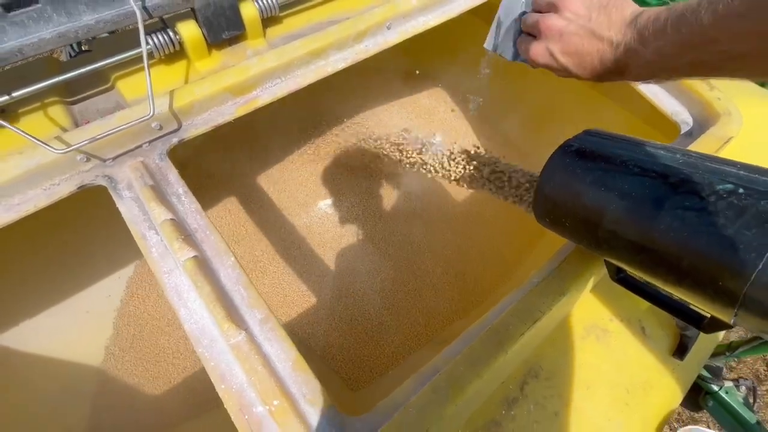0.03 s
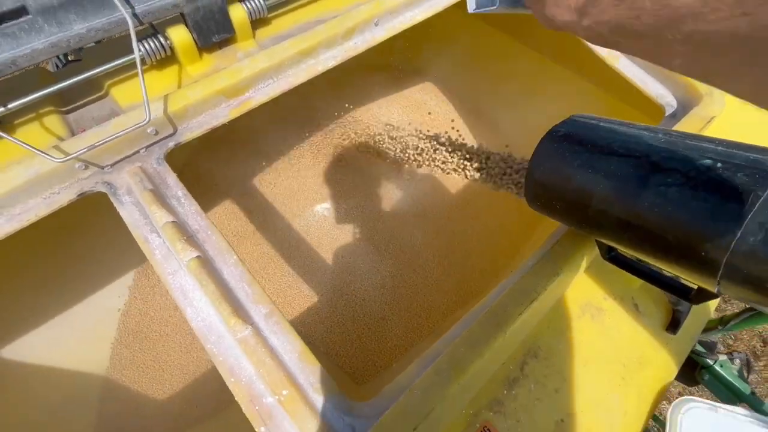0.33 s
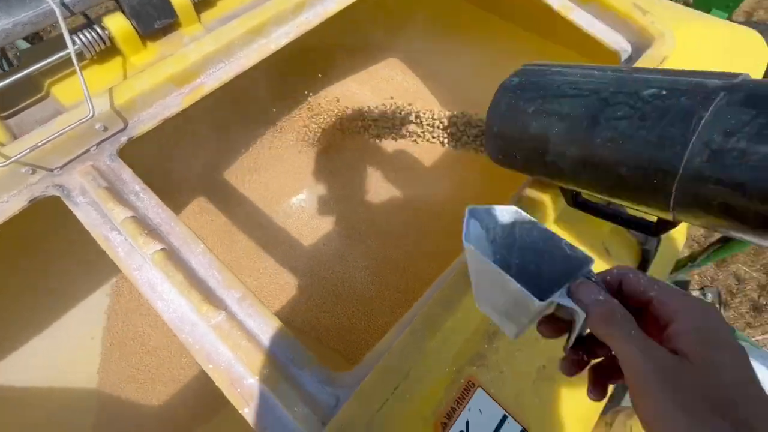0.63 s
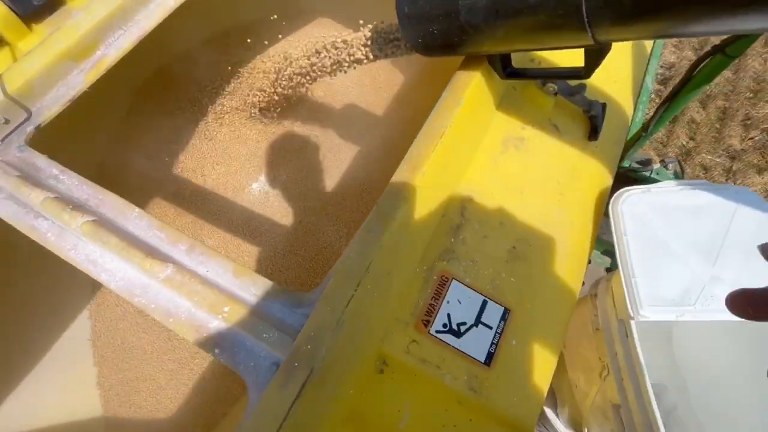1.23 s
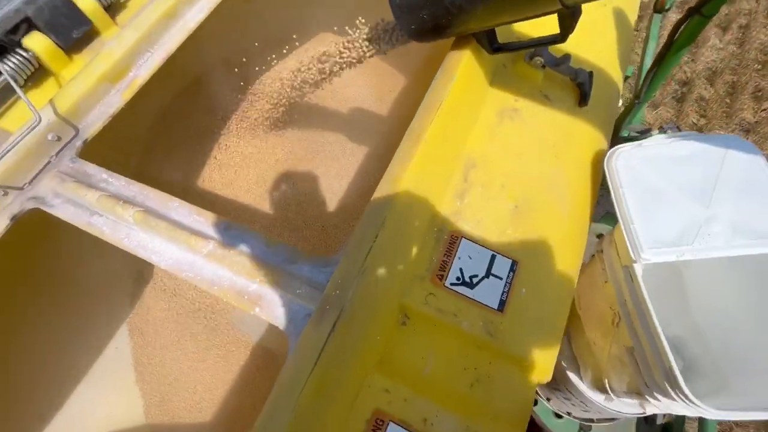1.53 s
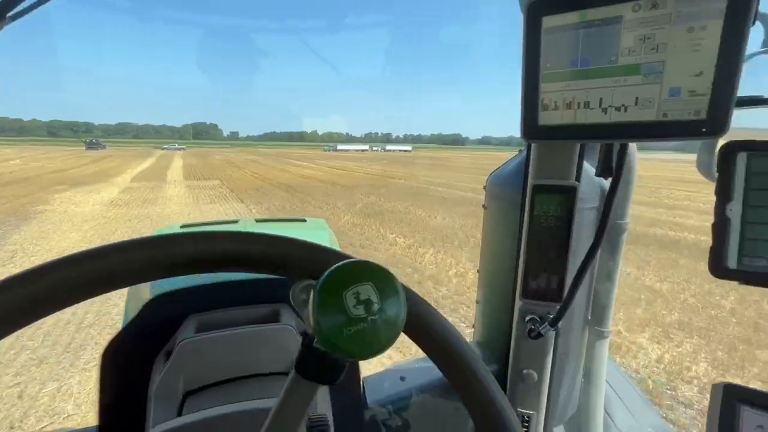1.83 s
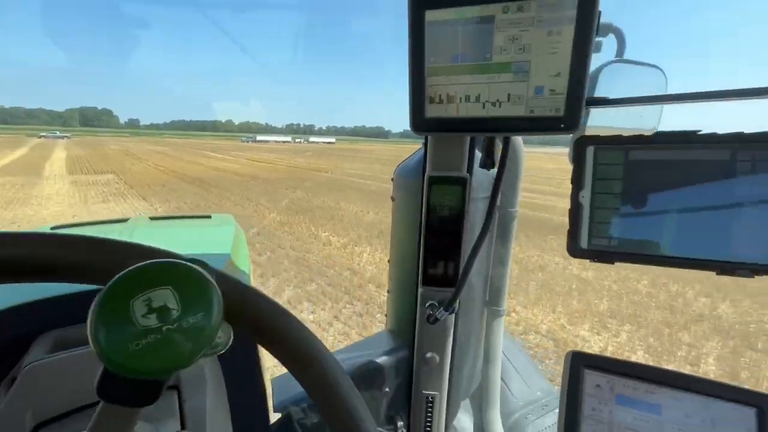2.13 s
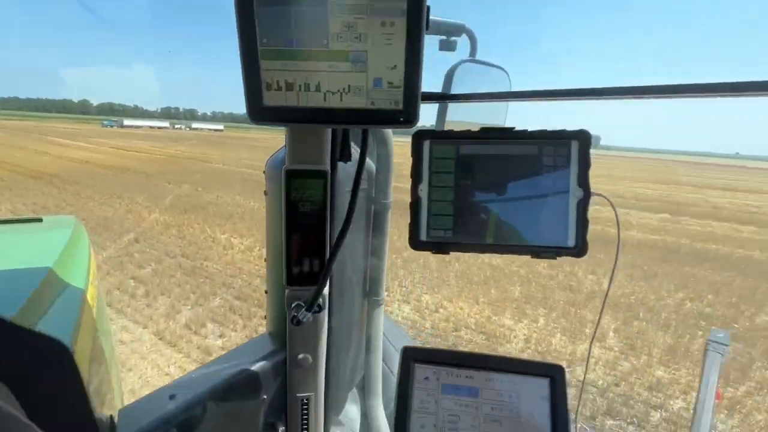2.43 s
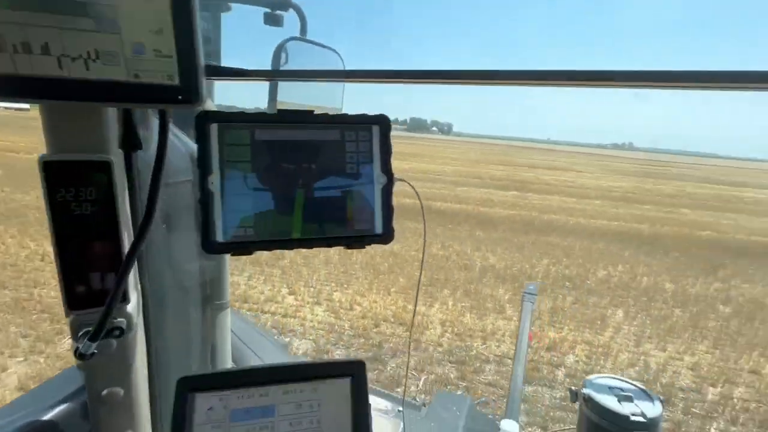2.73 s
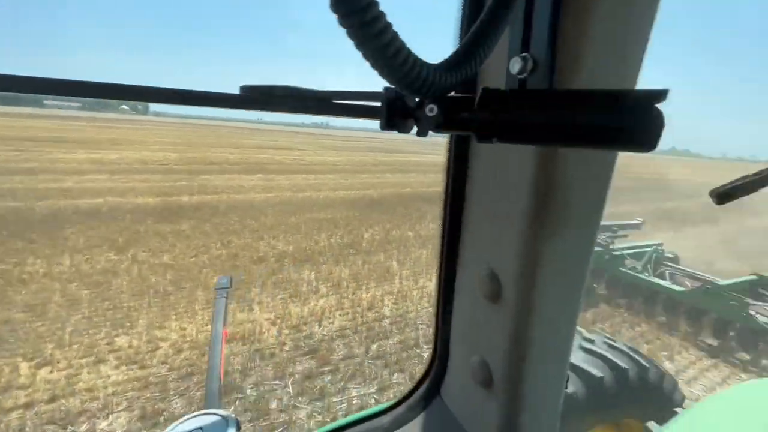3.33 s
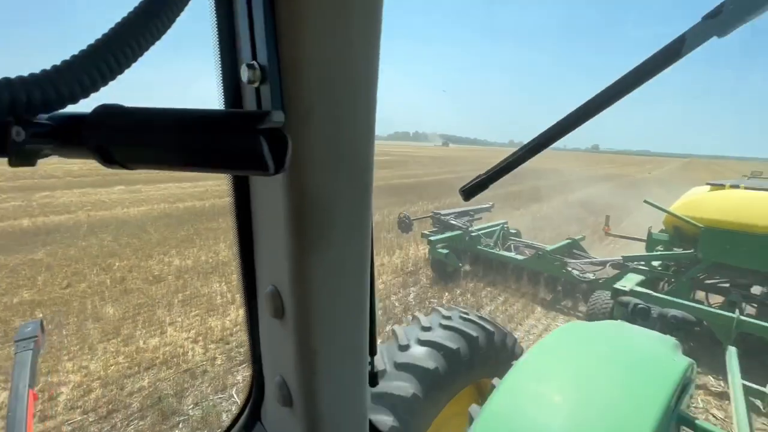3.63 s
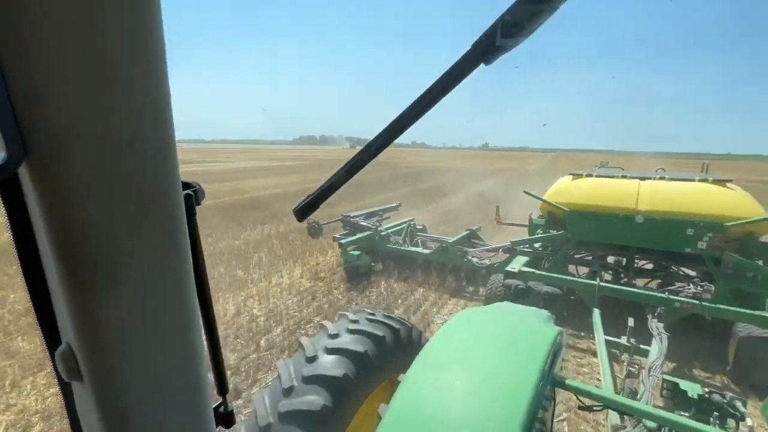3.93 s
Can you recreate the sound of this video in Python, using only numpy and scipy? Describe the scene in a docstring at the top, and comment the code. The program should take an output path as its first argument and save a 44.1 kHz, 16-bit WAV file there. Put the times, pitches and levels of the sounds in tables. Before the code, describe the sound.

Grain hisses into a planter bin before a sudden switch to a tractor cab's diesel drone.

```python
"""A six-cylinder tractor diesel drones in a closed cab, after an opening scene of seed filling a planter.
First, grains stream from a conveyor spout onto the heap in a plastic hopper, ringing spout and wall,
over the throb of a small petrol engine. At 1.67 s the scene cuts to the cab: firing note and clatter,
whine of hydraulic pump and gears. Tyres and frame make the cab boom more and more, and loose fittings
knock a few times on the rough field."""
import sys
import numpy as np
from scipy import signal
from scipy.fft import rfft, irfft
from scipy.io import wavfile
from scipy.ndimage import map_coordinates

SR = 44100
rng = np.random.default_rng(int(sys.argv[2]) if len(sys.argv) > 2 else 0)


def to_wav(s):
    """Save 16-bit WAV."""
    ch = np.atleast_2d(s).T  # columns
    pcm = np.round(np.clip(ch, -1, 1) * 32767)  # PCM
    wavfile.write(sys.argv[1], SR, pcm.astype(np.int16))


N = 176400
TIME_S = np.arange(N) / SR
BIN_HZ = np.maximum(np.arange(N // 2 + 1) * SR / N, 1)
CUT_S = 1.671

# Seed stream strength: time_s, level_db
SEED_FLOW = [(0.0, -25.5), (0.27, -25.5), (0.5, -27), (0.66, -25), (1.59, -27), (1.64, -25.5),
             (1.65, -26.5)]
# Grains on the heap: freq_hz, gain_db
SEED_SPECTRUM = [(350, -26), (560, -23), (770, -3), (880, -13.5), (1000, -15.5), (1250, -6), (1480, -12),
                 (1700, -7.5), (2100, -6.5), (2950, -5.5), (3250, -1.5), (3800, -0.5), (4500, -3),
                 (5400, -5), (5750, -7), (6700, -6.5), (7800, -8.5), (9200, -4), (10500, -3.5),
                 (12500, -3.5), (14500, -14.5)]
# Hopper wall reflections: start_delay_s, cut_delay_s, gain
WALL_ECHOES = [(.0021, 0.0011, 0.079), (.0034, 0.0018, 0.11), (.0052, 0.0047, 0.15)]
# Hopper stereo field: freq_hz, correlation, left_minus_right_db
HOPPER_SPACE = [(100, 0.95, 15), (259, 0.51, -1), (497, -0.35, 2.5), (780, -0.11, -3.5),
                (1400, -0.58, -0.5), (2800, 0.35, 0.5), (3770, 0.18, 1.5), (5100, -0.054, 7),
                (6800, -0.05, 4.5), (8650, 0.038, -2.5), (9400, -0.17, -4.5), (10200, 0.86, 1)]
# Spout and wall modes, relative to the stream: pitch_hz, width_hz, start_db, cut_db
HOPPER_MODES = [(788, 100, -21.5, -25.5), (996, 90, -19, -25), (3340, 360, -11.5, -24.5),
                (3810, 120, -14.5, -15), (4450, 400, -14.5, -20), (5090, 220, -44, -10.5),
                (5370, 550, -20, -18)]
# Spout swinging across: time_s, left_minus_right_db
SPOUT_PAN = [(0, -2.5), (.7, -1.5), (1.65, 0.5)]

# Conveyor engine, low and high harmonics: cycle_multiple; gain_db
CONVEYOR_ORDERS = [2, 3, 4, 5, 6]
CONVEYOR_ORDERS_DB = [-15, -21, -1, 3, -18]
CONVEYOR_OVERTONES = [7, 10, 11, 14, 15, 17, 18]
CONVEYOR_OVERTONES_DB = [-20, -8.5, -21, -13.5, -18, -20, -24]
# Belt rumble: freq_hz, gain_db
BELT_SPECTRUM = [(20, -36), (36, -22), (50, 4), (130, 0), (220, -1), (330, 1.5), (450, -3), (750, -1),
                 (1500, -10), (3000, -25.5)]

# Diesel, pump and gear harmonics: rate_multiple; gain_db
DIESEL_ORDERS = [2, 3, 4, 5, 8, 9, 10, 18, 36, 49, 54, 63, 66, 70]
DIESEL_ORDERS_DB = [-44, -42.5, -52, -37, -42, -45.5, -47.5, -38.5, -49, -52.5, -46.5, -44, -46, -43.5]
PUMP_ORDERS = [4, 5]
PUMP_ORDERS_DB = [1, -2.5]
GEAR_ORDERS = [1, 2, 5, 7, 9]
GEAR_ORDERS_DB = [-0.5, 0.5, -11.5, -21, -21]
# Firing note, engine noise, pump and gear envelopes: time_s, gain_db
FIRING_LEVEL = [(1.7, -36), (2.4, -39.5), (2.57, -25), (2.71, -32), (2.87, -26), (3.1, -27), (3.25, -22.5),
                (3.38, -28), (3.72, -24.5), (4, -28.5)]
ENGINE_NOISE_LEVEL = [(1.72, -28), (1.74, -29), (2.87, -29), (3.07, -30), (3.49, -28.5), (3.97, -29.5)]
PUMP_LEVEL = [(1.7, -35), (2.6, -34), (3.05, -38), (3.6, -35.5), (4, -58)]
GEAR_LEVEL = [(1.7, -44), (2.05, -40), (2.3, -40.5), (2.6, -37), (3.35, -39), (3.55, -42.5), (4, -41.5)]
# Engine and running gear through the glass: freq_hz, gain_db
ENGINE_NOISE_SPECTRUM = [(120, -33), (200, -7), (329, 3), (386, -10.5), (425, -1), (560, -6.5), (640, -11),
                         (780, -10), (950, -10), (1330, -11), (1540, -17.5), (1660, -15), (1770, -18.5),
                         (1920, -14), (2500, -14.5), (2700, -20.5), (3040, -26.5), (5650, -34), (7930, -39),
                         (10700, -39.5), (14000, -58)]
# Cab stereo field: freq_hz, correlation, left_minus_right_db
CAB_SPACE = [(50, 1, -3.5), (160, 0.8, -1.5), (450, 0.58, -0.5), (660, -0.052, 4), (1210, 0.047, 3),
             (1670, -0.36, 1), (2400, 0.12, -0.5), (4740, -0.065, 7), (7140, 0.11, 6.5),
             (9700, -0.058, -1.5), (10600, 0.96, -0.5)]
# Gear and hydraulic whines: pitch_hz, width_hz, level_db
WHINES = [(478.5, 7.4, -46), (1298, 4.8, -42), (2234, 4.1, -51), (3400, 13, -58), (4090, 23, -58),
          (4716, 18, -64), (5150, 25, -60), (5520, 19, -57), (6120, 20, -61), (6620, 15, -63),
          (8300, 60, -69), (10940, 150, -69)]
# Swelling whines: pitch_hz; width_hz, peak_db, peak_s, half_width_s
SWELL_HZ = [2398, 2548, 5739, 5830]
SWELLS = [(12, -43, 3.43, 0.96), (11.9, -38, 3.34, 0.084), (25, -58, 2.5, 0.66), (25, -53, 2.73, .1)]

# Tyres and frame: freq_hz, gain_db
RUMBLE_SPECTRUM = [(20, -22), (35, -28), (62, -4.5), (78, -9), (100, -4), (140, -4), (195, -25)]
# Cab resonance and hum envelopes: time_s, level_db
LOW_BOOM_LEVEL = [(1.7, -34.5), (2.4, -39.5), (3, -29.5), (3.7, -28.5), (4, -31)]
MID_BOOM_LEVEL = [(1.7, -41.5), (3, -41), (3.5, -35.5), (3.83, -27.5), (4, -32)]
HIGH_BOOM_LEVEL = [(1.7, -29), (2, -29), (2.6, -29), (3.1, -36.5), (4, -33.5)]
GROWL_LEVEL = [(1.7, -40), (2.6, -32.5), (3, -48), (4, -56)]
HUM_LEVEL = [(1.7, -40), (2.65, -38.5), (3.05, -44), (3.48, -28), (3.62, -33.5), (3.82, -34), (4, -39)]

# Blows on the trim: start_s, strength_db, relative_ring_db
KNOCKS = [(2.8255, -28, 2), (2.831, -25, -2), (2.962, -36, -6), (3.484, -27.5, -6), (3.783, -28, -6)]
# Trim rattle: freq_hz, gain_db
RATTLE_SPECTRUM = [(300, -20), (800, 9), (1600, 0), (2500, 3), (3500, -12), (6000, -13.5), (9000, -27),
                   (14000, -39)]
# Knocked panel: pitch_hz, gain_db, t60_s
TRIM_MODES = [(840, -5, 0.089), (950, 0, .07), (1230, 9, 0.022), (1360, 2, .016), (2236, -5, 0.1),
              (2650, -6, .13), (4800, -13, .1), (5374, -16, 0.15)]


def from_db(db):
    """Decibels to gain."""
    return 10 ** (np.asarray(db) / 20)


def unit_rms(x):
    """Scale to unit power; a stereo pair by its centre."""
    centre = x.mean(axis=0) if x.ndim > 1 else x
    return x / np.sqrt(np.mean(centre ** 2) + 1e-20)


def in_time(rows):
    """Join (time_s, value) points linearly."""
    return np.interp(TIME_S, *np.transpose(rows))


def over_hz(rows):
    """Columns of a frequency table per bin, joined on a log axis."""
    hz, *columns = np.transpose(rows)
    return [np.interp(np.log(BIN_HZ), np.log(hz), column) for column in columns]


def pan(db):
    """Stereo gains for a left-minus-right level."""
    return from_db(np.array([[.5], [-.5]]) * db)


def white():
    """Two independent white noises."""
    return rng.standard_normal((2, N))


def drift(rate_hz):
    """Slow random signal, unit RMS."""
    return unit_rms(irfft(rfft(rng.standard_normal(N)) / (1 + (BIN_HZ / rate_hz) ** 2), N))


def colour(spectrum):
    """Gain per bin from a (freq_hz, gain_db) table."""
    return from_db(over_hz(spectrum)[0])


def resonance(hz, width_hz):
    """Gain per bin of a steep-sided resonance."""
    return 1 / (1 + ((BIN_HZ ** 2 - hz ** 2) / (BIN_HZ * width_hz * np.sqrt(2))) ** 2)


def spread(pair, gain, space):
    """Filter two independent signals and mix them as mid and side; unit power."""
    correlation, balance_db = over_hz(space)
    correlation = np.clip(correlation, -.7, .99)
    mid, side = rfft(pair) * gain
    side = side * np.sqrt((1 - correlation) / (1 + correlation))
    return unit_rms(irfft(np.array([mid + side, mid - side]) * pan(balance_db), N))


def cycles(hz, wander):
    """Cycles elapsed at a slightly wandering rate."""
    return np.cumsum(hz * (1 + wander * drift(1.7))) / SR


def tones(turns, orders, levels_db, flutter_db=2.5, side_rad=0.53):
    """Multiples of a cycle rate, each with its own flutter and stereo phase drift."""
    out = 0
    for multiple, db in zip(orders, levels_db):
        phase = 2 * np.pi * (multiple * turns + rng.random())
        amplitude = np.sqrt(2) * from_db(db + flutter_db * drift(22))
        ear_phase = side_rad * drift(0.5) * np.array([[1], [-1]])
        out = out + amplitude * np.sin(phase + ear_phase)
    return out


def grain_hits(grains_per_s=9000, t60_s=0.0052, kinds=24):
    """Random tiny impacts; each kind of grain has its own crack."""
    age_s = TIME_S[:int(.01 * SR)]
    out = 0
    for _ in range(kinds):
        clicks = (rng.random(N) < grains_per_s / kinds / SR).astype(float)
        crack = rng.standard_normal(len(age_s)) * from_db(-60 * age_s / t60_s)
        out = out + signal.oaconvolve(clicks, crack - crack.mean())[:N]
    return unit_rms(out - out.mean())


def wall_echoes(pair):
    """Add hopper wall echoes; delays glide as the listener moves."""
    out = pair
    for start_delay_s, cut_delay_s, gain in WALL_ECHOES:
        delay_s = in_time([(0, start_delay_s), (CUT_S, cut_delay_s)])
        read_at = np.arange(N) - SR * delay_s
        out = out + gain * np.array([map_coordinates(x, [read_at], order=3) for x in pair])
    return out


def seed_stream(clump_db=0.46):
    """Seed lands in slight clumps and rings the spout and hopper wall."""
    hits = np.array([grain_hits(), grain_hits()])
    out = spread(wall_echoes(hits), colour(SEED_SPECTRUM), HOPPER_SPACE)
    for hz, width_hz, start_db, cut_db in HOPPER_MODES:
        ring = unit_rms(irfft(rfft(white()) * resonance(hz, width_hz), N))
        out = out + from_db(in_time([(0, start_db), (CUT_S, cut_db)])) * pan(db=8) * ring
    return out * from_db(in_time(SEED_FLOW) + clump_db * drift(18)) * pan(in_time(SPOUT_PAN))


def conveyor(cycle_hz=21.15, throb_depth=0.19):
    """A one-cylinder engine throbs; the belt rumble pulses with each cycle."""
    turns = cycles(cycle_hz, wander=0.0019)
    low = tones(turns, CONVEYOR_ORDERS, CONVEYOR_ORDERS_DB, flutter_db=0.1, side_rad=0.21)
    high = tones(turns, CONVEYOR_OVERTONES, CONVEYOR_OVERTONES_DB, flutter_db=2, side_rad=0.2)
    engine = from_db(-39.5) * (low + high) * pan(db=1)
    belt = from_db(-40) * spread(white(), colour(BELT_SPECTRUM), HOPPER_SPACE)
    return engine + belt * (1 + throb_depth * np.sin(2 * np.pi * turns))


def tube_hum(pitch_hz=168.3, period_s=0.2):
    """The conveyor tube's hum swells and fades."""
    swell = np.abs(np.cos(np.pi * TIME_S / period_s))
    return swell * tones(cycles(pitch_hz, wander=0.0019), [1], [-41], flutter_db=1.5, side_rad=0.21)


def diesel(cycle_hz=18.53, cylinders=6, clatter_db=-6.5, highpass_hz=312):
    """Firing note and engine orders over per-cycle clatter and the rush of the running gear."""
    turns = cycles(cycle_hz, wander=0.0022)
    firing = tones(turns, [cylinders], [0], flutter_db=1.2, side_rad=0.093)
    orders = tones(turns, DIESEL_ORDERS, DIESEL_ORDERS_DB) * pan(db=3)
    read_at = turns % 1 * SR / cycle_hz  # same noise every cycle
    clatter = np.array([map_coordinates(x[:SR // 8], [read_at], order=3) for x in white()])
    through_glass = colour(ENGINE_NOISE_SPECTRUM) / (1 + (highpass_hz / BIN_HZ) ** 4)
    noise = spread(white() + from_db(clatter_db) * clatter, through_glass, CAB_SPACE)
    noise_db = in_time(ENGINE_NOISE_LEVEL) + 1 + drift(16)
    return from_db(in_time(FIRING_LEVEL)) * firing + orders + from_db(noise_db) * noise


def hydraulic_pump(rate_hz=107.1):
    """The pump sings at two multiples of its rate."""
    whine = tones(cycles(rate_hz, wander=0.00354), PUMP_ORDERS, PUMP_ORDERS_DB)
    return from_db(in_time(PUMP_LEVEL)) * whine * pan(db=3)


def gear_mesh(mesh_hz=417):
    """Meshing teeth whine, beating against the pump."""
    whine = tones(cycles(mesh_hz, wander=0.001145), GEAR_ORDERS, GEAR_ORDERS_DB)
    return from_db(in_time(GEAR_LEVEL)) * whine * pan(db=3)


def cab_band(hz, width_hz):
    """Resonant noise band in the cab's stereo field."""
    return spread(white(), resonance(hz, width_hz), CAB_SPACE)


def thin_whines(sway_db=0.5):
    """Gears and hydraulics sing in unsteady lines; some swell as the listener turns."""
    out = 0
    for hz, width_hz, db in WHINES:
        out = out + from_db(db + sway_db * drift(2.4)) * cab_band(hz, width_hz)
    for hz, (width_hz, peak_db, peak_s, half_width_s) in zip(SWELL_HZ, SWELLS):
        swell = 1 / (1 + ((TIME_S - peak_s) / half_width_s) ** 2)
        out = out + from_db(peak_db) * swell * cab_band(hz, width_hz)
    return out


def cab_rumble(lowpass_hz=186):
    """Tyres and frame shake the cab and excite its air and panel resonances."""
    spectrum = colour(RUMBLE_SPECTRUM) / (1 + (BIN_HZ / lowpass_hz) ** 4)
    return (from_db(-30.5) * spread(white(), spectrum, CAB_SPACE)
            + from_db(in_time(LOW_BOOM_LEVEL)) * cab_band(hz=101.5, width_hz=21)
            + from_db(in_time(MID_BOOM_LEVEL)) * cab_band(hz=158, width_hz=69)
            + from_db(in_time(HIGH_BOOM_LEVEL)) * cab_band(hz=266, width_hz=91)
            + from_db(in_time(GROWL_LEVEL)) * cab_band(hz=927, width_hz=57))


def cab_hum(pitch_hz=169):
    """A hum that grows towards the side window."""
    hum = tones(cycles(pitch_hz, wander=0.00596), [1], [0], flutter_db=4, side_rad=0.25)
    return from_db(in_time(HUM_LEVEL)) * hum


def fittings(attack_s=0.001, rattle_t60_s=0.13):
    """Loose trim knocks: each blow rings the panel's modes and leaves a short, dull rattle."""
    envelope, rings = 0, 0
    for start_s, db, ring_db in KNOCKS:
        age_s = np.maximum(TIME_S - start_s, 0)
        attack = 1 - np.exp(-age_s / attack_s)
        envelope = envelope + attack * from_db(db - 60 * age_s / rattle_t60_s)
        for hz, mode_db, t60_s in TRIM_MODES:
            strength = from_db(db + ring_db + mode_db + rng.standard_normal((2, 1)))
            decay = from_db(-60 * np.minimum(age_s / t60_s, 2))
            rings = rings + strength * decay * np.sin(2 * np.pi * hz * age_s)
    rattle = from_db(-2) * envelope * spread(white(), colour(RATTLE_SPECTRUM), CAB_SPACE)
    return rattle + rings


def scene(fade_s=0.0039):
    """The hopper, then a cut to the cab."""
    hopper = seed_stream() + conveyor() + tube_hum()
    machinery = diesel() + hydraulic_pump() + gear_mesh() + thin_whines()
    cab = machinery + cab_rumble() + cab_hum() + fittings()
    past_cut = (TIME_S - CUT_S) / fade_s
    return hopper * np.clip(-past_cut, 0, 1) + cab * np.clip(past_cut, 0, 1)


def record(dry):
    """Steep low-pass at 14.5 kHz."""
    return signal.sosfilt(signal.ellip(12, .1, 90, 14500, fs=SR, output="sos"), dry)


dry = scene()
out = record(dry)
to_wav(out)
```